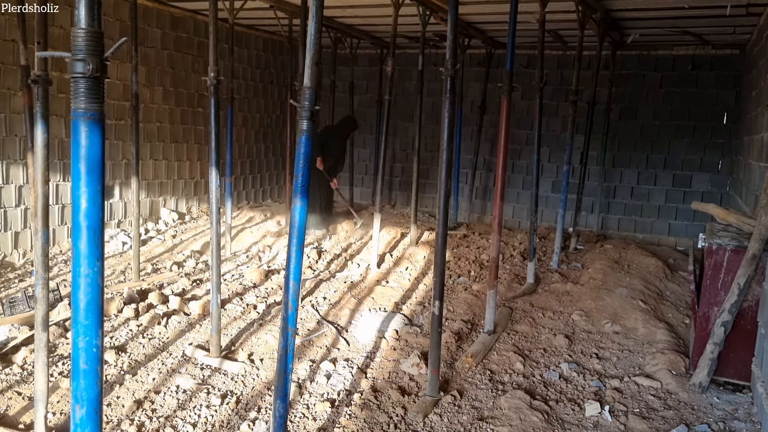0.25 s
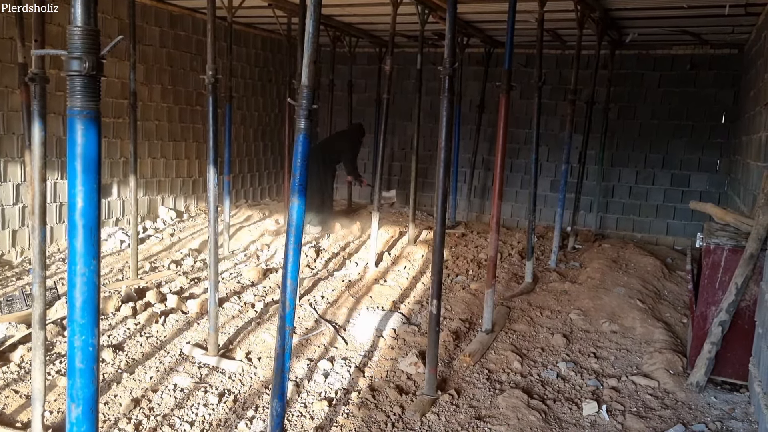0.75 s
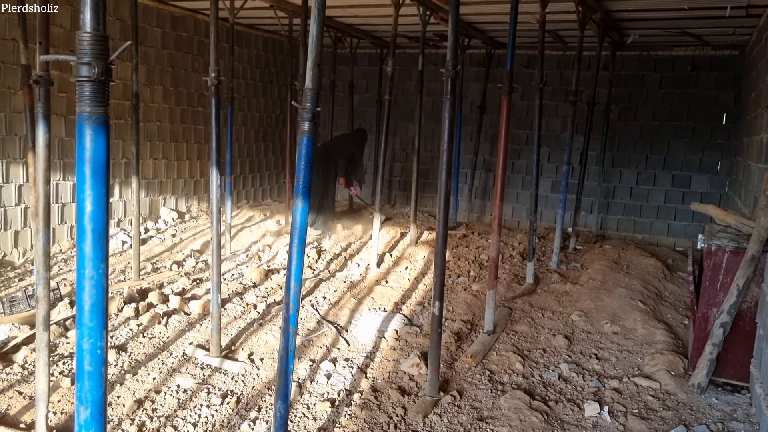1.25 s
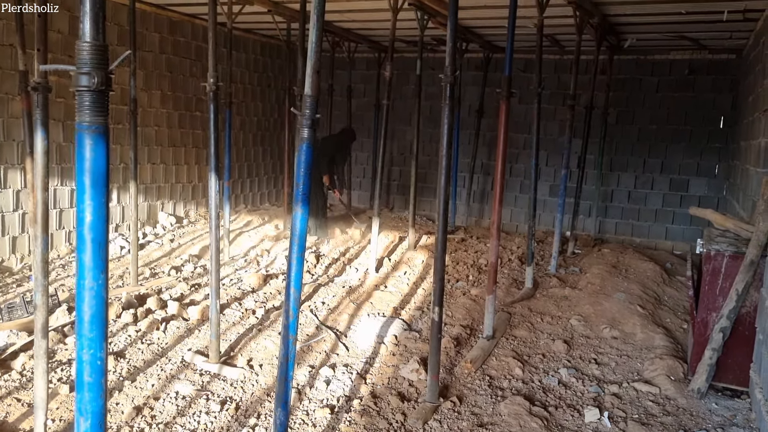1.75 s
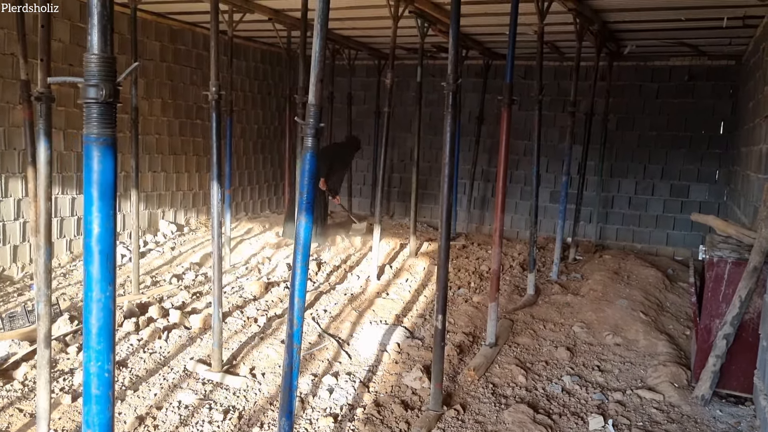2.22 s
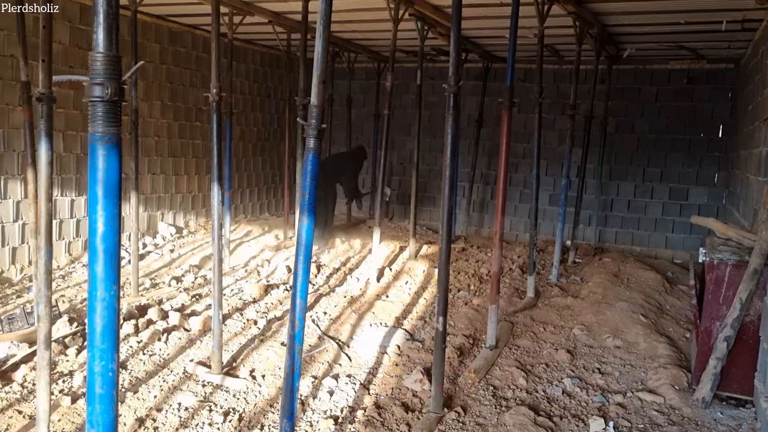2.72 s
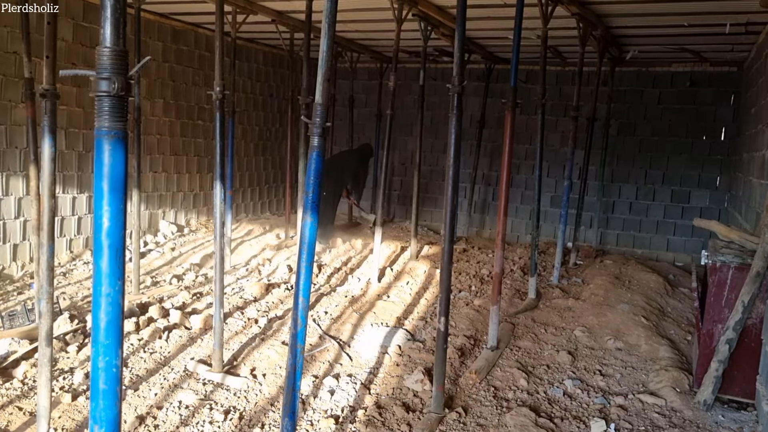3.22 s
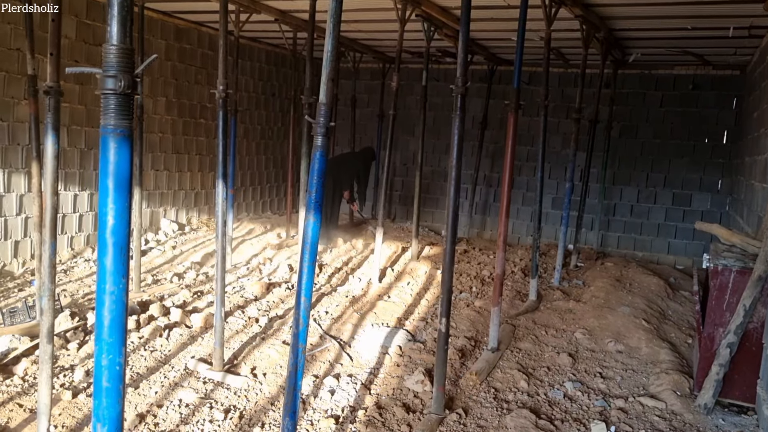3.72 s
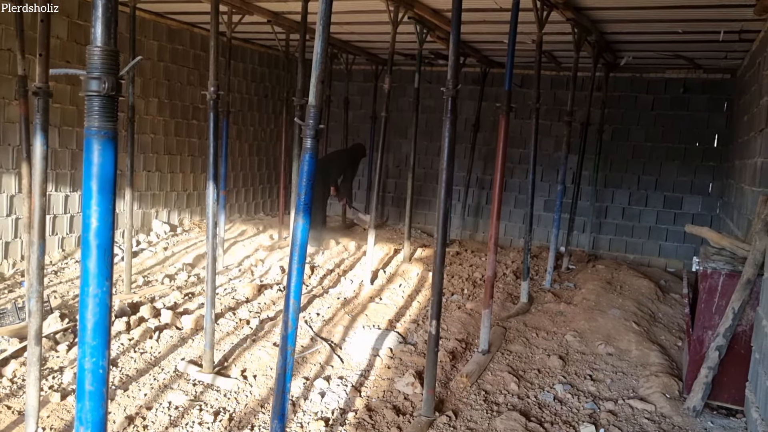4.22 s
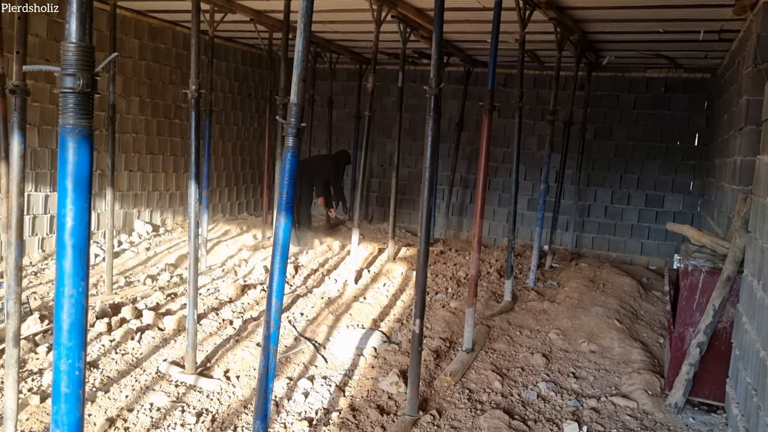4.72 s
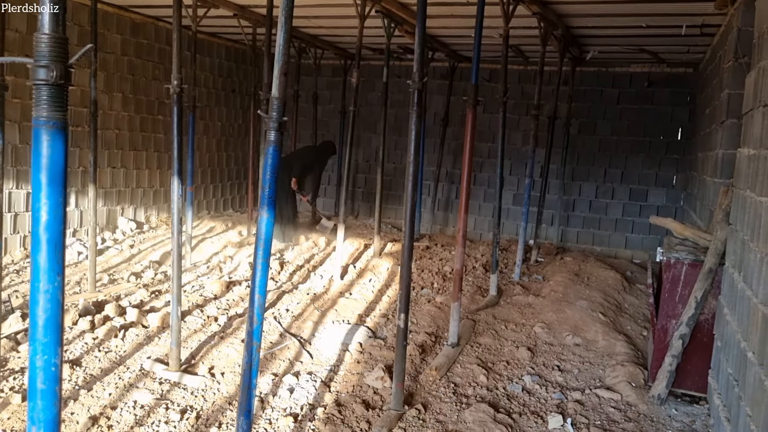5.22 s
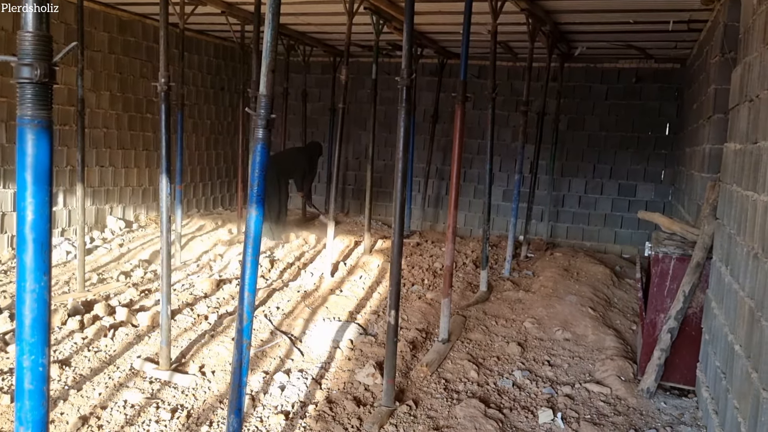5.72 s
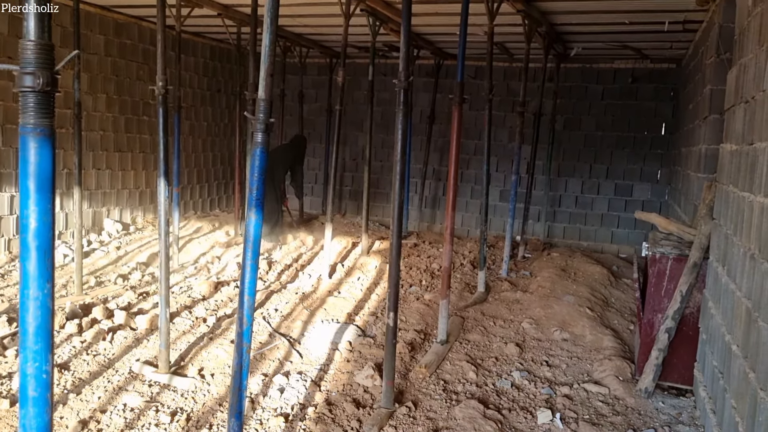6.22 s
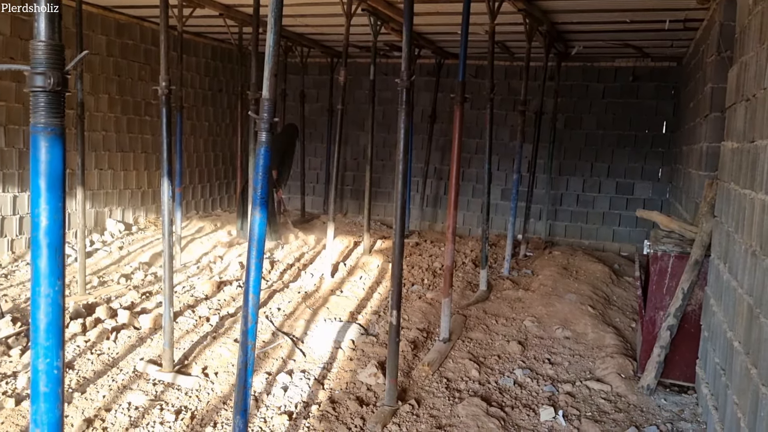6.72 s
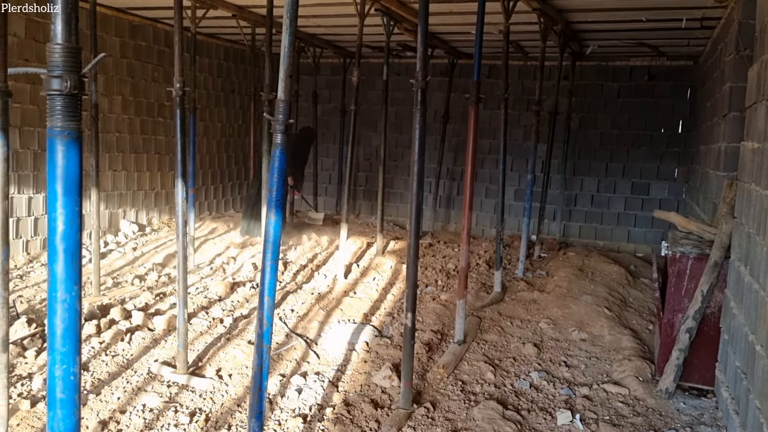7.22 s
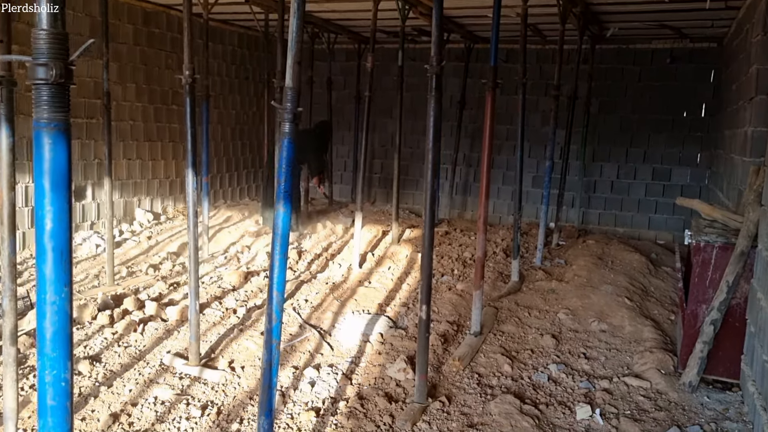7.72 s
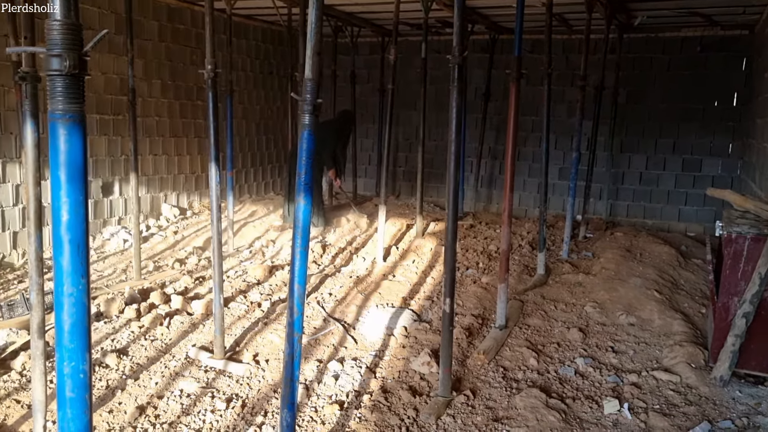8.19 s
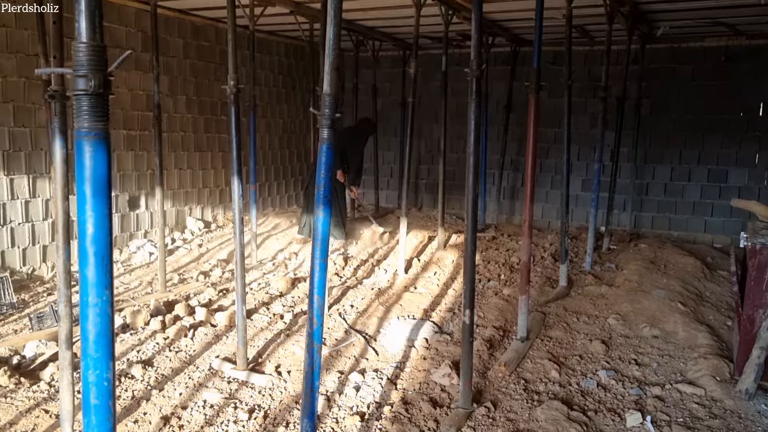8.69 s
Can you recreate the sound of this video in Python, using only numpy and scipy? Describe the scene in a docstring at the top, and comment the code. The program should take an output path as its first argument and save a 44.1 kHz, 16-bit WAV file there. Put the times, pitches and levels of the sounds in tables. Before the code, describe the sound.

Single metallic knocks and short crunches open the digging, then harder blows against stone ring through the shovel blade, followed by trickling earth. Later comes a slower long scrape, then loose clods and soft steps. The unfinished room adds close scatter and a short tail. Wind rumbles against the handheld microphone, a finger clicks on its case, and sparrows whistle faintly outside.

```python
"""Grit crunches as a steel shovel works dry stony earth some metres away in an unfinished block building.
Contact swells drive random grains, heard directly and through the blade's modes; stones strike and squeak.
Wind, made of coloured noise, buffets the two microphone ports; clods, pebbles and dull low footfalls are
short tones. Sparrows outside are gliding whistles, a finger ticks on the hand-held recorder, and steel
props ring as fading sines. A faint hush stays underneath; the room adds near scatter and a tail."""
import sys
import numpy as np
from scipy import signal
from scipy.fft import rfft, irfft, next_fast_len
from scipy.io import wavfile

SR = 44100
rng = np.random.default_rng(int(sys.argv[2]) if len(sys.argv) > 2 else 0)


def to_wav(s):
    """Save 16-bit WAV."""
    ch = np.atleast_2d(s).T  # columns
    pcm = np.round(np.clip(ch, -1, 1) * 32767)  # PCM
    wavfile.write(sys.argv[1], SR, pcm.astype(np.int16))


N = 394694

# Blade on stone. Each row: start in seconds, relative level of the hit in dB, relative level of the thump in dB.
STRIKES = [(1.041, -35.5, -46), (1.442, -64, -75), (1.902, -57, -52.5), (2.931, -34, -34.5),
           (3.668, -33, -43), (3.709, -16.5, -63), (3.887, -33, -61), (4.701, -23.5, -77),
           (5.802, -33, -45.5), (6.962, -36.5, -43.5), (7.63, -42, -47.5)]
# Tone of grit and splintering stone. Each row: frequency in Hz, relative spectrum level in dB.
GRIT_COLOUR = [(710, -32.5), (1200, 3.5), (1540, -16.5), (2040, -9.5), (2300, -2), (3150, -7.5),
               (4100, -2.5), (6370, 0.5), (7330, -2.5), (9110, -24.5), (12700, -19.5), (16000, -25.5)]


def from_db(db):
    """Gain of a level in dB."""
    return 10 ** (np.asarray(db) / 20)


def rms_one(x):
    """Scaled to rms 1."""
    return x / np.sqrt(np.mean(x ** 2) + 1e-20)


def in_time(rows):
    """Columns of a table, joined by straight lines and read at every sample."""
    s, *columns = np.transpose(rows)
    return [np.interp(np.arange(N) / SR, s, c) for c in columns]


def at_hz(points, hz):
    """A table read on a log-frequency axis."""
    table = np.array(points)
    return np.interp(np.log(hz + 1), np.log(table[:, 0]), table[:, 1])


def colour(x, spectrum):
    """Filter by a smooth curve of dB over Hz."""
    size = next_fast_len(x.shape[-1])
    gain = from_db(at_hz(spectrum, np.fft.rfftfreq(size, 1 / SR)))
    return irfft(rfft(x, size) * gain, size)[..., :x.shape[-1]]


def drift(rate_hz):
    """Slow random wandering of rms 1: noise through two equal low-pass poles."""
    step = 40   # samples between the slow values
    r = np.exp(-2 * np.pi * rate_hz * step / SR)
    noise = rng.standard_normal(N // step + 2002)
    slow = signal.lfilter([1], [1, -2 * r, r * r], noise)[2000:]   # the filter has settled
    return np.interp(np.arange(N) / step, np.arange(len(slow)), rms_one(slow))


def grains(per_s, spread_db):
    """Random contacts of uneven size, coming in clumps; rms 1."""
    sizes = from_db(spread_db * np.minimum(rng.exponential(1, N), 5)) * rng.choice([-1, 1], N)
    chance = per_s * from_db(3.5 * drift(40)) / SR
    return rms_one(sizes * (rng.random(N) < chance))


def ring(x, hz, width):
    """One resonance of the given width in Hz, gain 1 on top."""
    r = np.exp(-np.pi * width / SR)
    poles = [1, -2 * r * np.cos(2 * np.pi * hz / SR), r * r]
    return signal.lfilter([(1 - r * r) / 2, 0, (r * r - 1) / 2], poles, x + 1e-18)


def contact():
    """Gains of grit, clods and bowl: each contact swells, changes over its length and is released."""
    # Crunch of blade, falling clods or footsteps, one row a push, drag, slide or step.
    # Each row: start, rise and length in seconds, relative grit level at the top and at the end in dB,
    # clods and ring of the bowl relative to grit in dB.
    crunches = [ (0, 0.00067, 0.0046, -49, -55, 4.5, 9), (.05, 0.025, 0.45, -65, -71, -6, 8),
                (0.238, 0.00099, 0.018, -48, -51.5, -7, -9), (.3, 0.047, 0.3, -100, -102.5, 15, -9),
                (.55, 0.036, 0.17, -70.5, -69, -8.5, -20), (.74, 0.028, .3, -77, -84, -2.5, 2),
                (1.041, 0.0012, 0.15, -43, -44.5, -2.5, 8), (1.2, 0.025, 0.096, -52, -42, -6, 10.5),
                (1.33, 0.034, .11, -43, -56, -5.5, -21.5), (1.439, 0.0042, 0.004, -26.5, -46.5, 7, 6.5),
                (1.518, 0.087, 0.41, -48.5, -70.5, -5.5, -1), (1.902, 0.0011, 0.022, -47, -48.5, -5, 8),
                (1.95, 0.01, 0.19, -58, -67.5, -2.5, 2), (2.27, 0.045, 0.12, -75, -87, 12.5, -3),
                (2.45, 0.027, .2, -75.5, -90.5, -2.5, -1), (2.672, 0.0017, 0.034, -64, -70, -17, -36),
                (2.933, 0.0087, 0.026, -29, -35, -6, 12), (3.05, 0.046, 0.4, -59, -86, -6.5, 2),
                (3.66, 0.013, .04, -34.5, -40.5, -9, 1.5), (3.71, 0.00098, 0.043, -26.5, -36, -7.5, 1.5),
                (3.75, 0.0046, 0.15, -46.5, -53.5, 0.5, -13), (3.889, .002, 0.058, -40.5, -60.5, 3.5, -23),
                (3.95, 0.011, 0.17, -59.5, -62.5, -0.5, -9), (4.19, 0.047, 0.14, -66, -82, 7.5, 15),
                (4.28, .04, 0.052, -58.5, -70, -17.5, -6), (4.389, 0.045, 0.046, -80, -93, 21, 20),
                (4.48, .07, .12, -74.5, -82, -22, -27), (4.704, .002, 0.017, -31, -28, -8.5, 6),
                (4.76, 0.034, 0.1, -53.5, -53.5, -3, -22), (4.9, 0.049, 0.57, -65, -95, -2.5, 1),
                (5.65, 0.048, 0.15, -90.5, -75, -20, -22.5), (5.795, 0.015, 0.039, -38.5, -43, -13.5, 2),
                (5.891, 0.0038, 0.81, -48, -105, -2, -15), (6.15, 0.037, 0.57, -66.5, -61, 0.5, 3),
                (6.701, 0.28, 0.33, -51, -70, -1, -4), (7.04, .02, 0.21, -73, -69.5, 5.5, -8),
                (7.26, .03, 0.22, -76.5, -71, 2.5, -21), (7.46, 0.034, 0.17, -63.5, -69, -3.5, -29),
                (7.623, 0.02, 0.051, -43, -58, -6, -17), (7.691, 0.047, 0.23, -54.5, -57, -5.5, -4),
                (7.95, 0.061, .14, -57.5, -68, 2, 2), (8.08, 0.1, 0.48, -54, -68.5, -0.4, 0),
                (8.5, 0.013, 0.16, -59.5, -62.5, 3, -11), (8.635, 0.0018, 0.086, -57, -52.5, -7, -19),
                (8.73, .01, 0.25, -58.5, -82, -24, -4)]
    # Fall after the contact, in dB per second: grit, clods, bowl.
    release_db_per_s = (262, 221, 316.5)
    # Reduction at the start in dB: grit, clods, bowl; clods and bowl come in after the grit.
    late_db = (-1.4, 12, 17)
    late_s, swell_db = 0.0078, 22.5
    power = np.full((3, N), from_db(2 * -90.5))   # soil always trickles faintly
    for s, rise_s, length_s, top_db, end_db, clod_db, bowl_db in crunches:
        at = int(max(s, 0) * SR)
        t = np.arange(min(int((length_s + .4) * SR), N - at)) / SR
        rise_s = max(rise_s, 1 / SR)
        corners_s = [0, rise_s, max(length_s, rise_s + 1 / SR)]
        shape_db = np.interp(t, corners_s, [top_db - swell_db, top_db, end_db])
        released_s = np.maximum(t - length_s, 0)
        for k, share_db in enumerate((0, clod_db, bowl_db)):
            onset_db = late_db[k] * np.exp(-t / late_s)
            level_db = shape_db + share_db - onset_db - release_db_per_s[k] * released_s
            power[k, at:at + len(t)] += from_db(2 * level_db)
    return np.sqrt(power)


def blade_ring(high, low, bowl, grit, clods):
    """Crunching earth and stone hits drive the modes of the steel blade."""
    # Modes of the steel. Each row: frequency in Hz, width in Hz unless damping widens it, relative level in dB.
    modes = [(587.9, 15, -3), (845.3, 12, 1.5), (1040, 28, -11), (1217, 55, -11.5), (1390, 36, -15),
             (1660, 45, -9), (1875, 29, -20), (2240, 50, -16.5), (2790, 15, -48.5), (3005, 40, -9),
             (3250, 170, -22.5), (3750, 69, -9), (4100, 21, -33), (5040, 27, -9.5), (5570, 140, -33),
             (5490, 120, -7.5), (6226, 88, -15), (7030, 110, -24.5), (9500, 49, -35)]
    least_width = .02   # share of the pitch: earth on the blade damps the high modes
    s, hit_db, _ = np.transpose(STRIKES)
    at = (s * SR).astype(int)
    grit_db = 20 * np.log10(high)
    out = np.zeros(N)
    for k, (hz, width, mode_db) in enumerate(modes):
        if hz < 700:
            drive = bowl * clods * from_db(26.5)
        elif hz < 1700:
            drive = low * clods * from_db(22.5)
        else:   # grit drives the high modes, more so the harder the push
            drive = high * grit * from_db(17.5 + 0.043 * (grit_db + 37.0))
        wander_db = 1.5 if hz < 700 else 3.5
        drive = drive * from_db(wander_db * drift(7))   # the contact point wanders
        drive[at] += from_db(hit_db + 29.0 + rng.normal(0, 3.8, len(at)))
        sign = (-1) ** k
        out += sign * from_db(mode_db) * ring(drive, hz, max(width, least_width * hz))
    return out


def stone_hits():
    """Stone splinters for a few ms as decaying noise, and the ground gives a dull thump."""
    s, hit_db, thump_db = np.transpose(STRIKES)
    at = (s * SR).astype(int)
    crack, thump = np.zeros(N), np.zeros(N)
    crack[at], thump[at] = from_db(hit_db - 4), from_db(thump_db)
    crack_fade, thump_fade = np.exp(-1 / (0.0047 * SR)), np.exp(-1 / (0.051 * SR))   # decay times in s
    splinter = rms_one(colour(rng.standard_normal(N), GRIT_COLOUR))
    ground = rms_one(ring(rng.standard_normal(N), 160.0, 77))
    cracks = signal.lfilter([1], [1, -crack_fade], crack) * splinter
    return cracks + signal.lfilter([1], [1, -thump_fade], thump) * ground


def shovel():
    """Grit and clods crunch at blade or foot; part is heard directly, part through the modes of the steel."""
    # Tone of the clods. Each row: frequency in Hz, relative spectrum level in dB.
    clod_colour = [(82, -37.5), (140, -7.5), (178, 1), (363, -7.5), (602, -3.5), (1090, -9.5),
                   (1520, -16.5), (2500, -24), (3250, -41), (5500, -120)]
    high, low, bowl = contact()
    grit, clods = grains(per_s=3000, spread_db=-0.5), grains(per_s=500, spread_db=2.5)
    crunch = from_db(-1.5) * high * rms_one(colour(grit, GRIT_COLOUR))
    crunch += from_db(5.0) * low * rms_one(colour(clods, clod_colour))
    return crunch + blade_ring(high, low, bowl, grit, clods) + stone_hits()


def scatter(x, count):
    """Near echoes, own at each port; the source wanders between places that scatter differently."""
    t60_s, level_db = 0.027, 6.5   # off ground and props, above 1.5 kHz
    t = np.arange(SR // 10) / SR
    weights = np.array([from_db(19.0 * drift(11.4)) for place in range(count)])
    weights = weights / np.sqrt(np.sum(weights ** 2, axis=0))
    high_pass = signal.butter(2, 1500, "high", fs=SR, output="sos")
    echoes = signal.sosfilt(high_pass, rng.standard_normal((count, 2, len(t))))
    echoes = echoes * from_db(level_db - 60 * t / t60_s) / np.sqrt(t60_s * SR / np.log(1e6))
    return sum(signal.oaconvolve((x * w)[None], e, axes=1)[:, :N] for w, e in zip(weights, echoes))


def hall(x, wet_db):
    """Direct sound reaches the left port first; near scatter follows at once, then a tail dying by band."""
    # The room. Each row: frequency in Hz, t60 in seconds, relative level of the tail in dB.
    room = np.array([(200, 0.49, -10), (680, 0.13, -4.5), (2070, 0.29, 2.5), (4985, 0.3, -4.5),
                     (10000, 0.18, -2.5)])
    right_lag_s = 0.00024   # sound arrives a little from the left
    t, tail = np.arange(SR // 2) / SR, 0
    edges = 100 * 2 ** np.arange(0, 7.6, .5)   # half-octave bands, Hz
    for low, high in zip(edges, edges[1:]):
        shared, own = rng.standard_normal(len(t)), rng.standard_normal((2, len(t)))
        alike = np.clip(1 - low / 2200, 0, 1)   # long waves are alike at both ports
        noise = np.sqrt(alike) * shared + np.sqrt(1 - alike) * own
        band = signal.sosfilt(signal.butter(2, [low, high], "band", fs=SR, output="sos"), noise)
        t60, tail_db = at_hz(room[:, :2], low), at_hz(room[:, ::2], low)
        tail = tail + band * from_db(tail_db - 60 * t / t60) / np.sqrt(t60 * SR / np.log(1e6))
    answer = from_db(wet_db) * tail * np.clip((t - .002) / 0.0073, 0, 1)   # the tail builds up
    answer[0, 0] += 1
    answer[1, round(right_lag_s * SR)] += 1
    return signal.fftconvolve(x[None], answer, axes=1)[:, :N] + scatter(x, count=4)


def at_ports(level_db, pan_db):
    """Power at left and right; the stronger port carries most of the level."""
    left, right = 1 / (1 + from_db(-2 * pan_db)), 1 / (1 + from_db(2 * pan_db))
    return 4 * from_db(2 * level_db) * np.array([left, right])


def wind():
    """Lumpy turbulence, its own at each port; buffets swell and die over the breeze."""
    # Breeze. Each row: time in seconds, relative level in dB, left minus right in dB.
    breeze = [(0, -49.5, 16), (.5, -57, 8), (.75, -43.5, 3), (1.2, -57, -2), (1.6, -55, 7), (1.9, -64, 3),
              (2.85, -72.5, 7), (3.0, -53.5, 19), (3.3, -61.5, 6), (3.45, -32, 1.5), (3.56, -34, 7),
              (3.9, -42.5, 6.5), (4.2, -72.5, 15), (4.7, -45, -10.5), (5.3, -65.5, 16.5), (6.3, -62, 1),
              (6.6, -54.5, 16), (7.25, -43.5, 9), (7.33, -78.5, 6), (7.6, -59.5, 9), (8.3, -62.5, 6),
              (8.7, -49.5, -2), (8.95, -61, 1)]
    # Single buffets against the ports. Each row: time of the top in seconds, relative level in dB,
    # left minus right in dB.
    buffets = [(0.12, -37.5, 23), (0.169, -35, 39), (0.261, -37.5, 27), (0.4, -50.5, 54), (0.45, -46, 14),
               (0.681, -34, 15), (0.822, -36, 28), (0.948, -28, 31), (1.06, -36, 2), (1.14, -38.5, 8),
               (1.28, -40.5, 0), (1.48, -51, 20), (1.63, -47, 20), (2.95, -37.5, 17), (3.03, -38, 20),
               (3.16, -52, 16), (3.648, -21.5, 31), (3.822, -25.5, 21), (4.03, -39, 24), (4.14, -41.5, 0.5),
               (4.28, -43.5, 29), (4.41, -44.5, 28), (4.56, -41.5, -10.5), (4.76, -31, 21), (5.06, -51, 18),
               (5.12, -46, 25), (5.28, -49, 26), (5.551, -44, 32), (5.64, -55.5, 34), (5.7, -57, 25),
               (5.82, -63, 11), (5.98, -47, -3), (6.098, -36.5, 17), (6.24, -43, 6), (6.388, -40.5, 28),
               (6.458, -39.5, 32), (6.599, -23.5, 30), (6.742, -27, 39), (6.88, -40, 26), (6.98, -41, 9),
               (7.111, -35.5, 28), (7.179, -35.5, 33), (7.45, -46.5, 26), (7.7, -39.5, 21), (7.75, -47, 28),
               (8.03, -43.5, 12), (8.161, -38.5, 22), (8.68, -53, 3)]
    # Tone of the wind. Each row: frequency in Hz, relative spectrum level in dB.
    wind_colour = [(12, -59), (20, -15), (49, 3.5), (77, 1.5), (103, -4.5), (281, -32), (357, -40),
                   (614, -52.5), (900, -68.5), (1170, -76), (1980, -120)]
    rise_db_per_s, fall_db_per_s = 516.5, 382
    power, t = at_ports(*in_time(breeze)), np.arange(N) / SR
    for s, level_db, pan_db in buffets:
        near = slice(max(int((s - .25) * SR), 0), int((s + .25) * SR))
        away_db = np.maximum(rise_db_per_s * (s - t[near]), fall_db_per_s * (t[near] - s))
        power[:, near] += at_ports(level_db, pan_db)[:, None] * from_db(-2 * away_db)
    gusts = []
    for port in "LR":
        lumpy = rng.standard_normal(N) * from_db(2.7 * drift(49.0))
        gusts.append(rms_one(colour(lumpy, wind_colour)))
    return np.sqrt(power) * gusts


def hush():
    """Faint steady noise under everything, independent in left and right."""
    # Tone of the hush. Each row: frequency in Hz, relative spectrum level in dB.
    hush_colour = [(59, -20), (100, -1.5), (229, -8.5), (583, -20.5), (836, -25.5), (2520, -24.5),
                   (5530, -25.5), (6560, -24.5), (8640, -33), (13500, -21.5), (16000, -15)]
    return from_db(-67) * rms_one(colour(rng.standard_normal((2, N)), hush_colour))


def lumps():
    """Each lump or footfall rings at its own pitch, opens with a broad tick and crumbles a little."""
    # Clods and pebbles that land or knock together, and dull low footfalls. Each row: start in seconds,
    # relative level in dB, pitch in Hz, t60 of the crumble in seconds.
    landings = [(.058, -43, 863, 0.21), (.22, -54, 2200, 0.021), (0.421, -59.5, 867, 0.29),
                (1.72, -42, 790, 0.064), (1.915, -42, 237, 0.19), (2.111, -52.5, 1167, 0.091),
                (2.3, -57, 800, 0.17), (4.21, -54, 546, 0.21), (4.248, -64, 1342, 0.088),
                (4.4, -56, 769, 0.11), (4.412, -60.5, 1330, 0.13), (7.05, -57, 780, 0.082),
                (7.116, -48.5, 1866, 0.049), (7.239, -42.5, 1000, 0.019), (7.378, -53, 953, 0.068),
                (7.64, -47, 808, 0.21), (8.02, -41.5, 818, 0.052), (8.501, -41.5, 870, 0.039),
                (8.522, -44, 2340, 0.035), (8.522, -49, 1386, 0.083), (8.574, -43.5, 1444, 0.084),
                (8.575, -53, 2840, 0.066), (8.637, -42.5, 2830, 0.027), (8.641, -53, 1230, 0.12),
                (8.7, -51, 4850, 0.07), (8.71, -51.5, 894, 0.052), (6.901, -52.5, 503, 0.23),
                (7.645, -41, 171, 0.21), (8.024, -44.5, 187, 0.26), (8.219, -53, 180, 1),
                (8.631, -52.5, 169.8, 1)]
    out, t = np.zeros(N + SR), np.arange(SR // 2) / SR
    for s, level_db, hz, t60 in landings:
        knock = np.sin(2 * np.pi * hz * t) * from_db(-60 * t / (1.23 * t60))
        crumble = 0.92 * rms_one(ring(rng.standard_normal(len(t)), hz, 0.081 * hz)) * from_db(-60 * t / t60)
        tick = 0.91 * rms_one(ring(rng.standard_normal(len(t)), hz, 0.5 * hz)) * from_db(-60 * t / 0.0069)
        attack = np.minimum(t * hz / 0.74, 1)   # full after 0.74 of a cycle
        at = int(s * SR)
        out[at:at + len(t)] += from_db(level_db) * (knock + crumble + tick) * attack
    return out[:N]


def glides(rows, overtones, hoarseness):
    """Tones with a trembling pitch that hold, then glide and weaken."""
    out, hoarse = np.zeros(N), drift(210)
    glide_fade_db = 7.5
    for s, held_s, glide_s, first_hz, last_hz, level_db in rows:
        span = np.arange(int(s * SR), int((s + held_s + glide_s) * SR))
        glided = np.clip((span / SR - s - held_s) / glide_s, 0, 1)
        hz = first_hz * (last_hz / first_hz) ** glided * (1 + hoarseness * hoarse[span])
        phase = 2 * np.pi * np.cumsum(hz) / SR
        tone = sum(from_db(db) * np.sin(round(k) * phase) for k, db in overtones)
        level = from_db(level_db - glide_fade_db * glided)
        out[span] += signal.windows.tukey(len(span), .3) * level * tone
    return out


def sparrows():
    """Short gliding whistles, mostly falling and slightly hoarse: one sine each."""
    # Whistles outside. Each row: start, held time and glide time in seconds, first and last pitch in Hz,
    # relative level in dB.
    chirps = [(2.04, .004, 0.042, 6430, 5130, -65), (2.09, 0.01, 0.021, 5450, 4460, -58.5),
              (2.39, 0.026, 0.029, 5720, 4260, -63.5), (2.389, 0.037, 0.013, 6400, 5540, -64),
              (2.535, 0.0046, 0.067, 6760, 4440, -65.5), (2.675, 0.0022, 0.015, 7470, 4100, -60.5),
              (2.69, .003, 0.05, 4700, 3540, -70.5), (2.692, 0.0024, 0.056, 4080, 2560, -67.5),
              (5.22, 0.031, 0.034, 5830, 2090, -60), (5.265, 0.0037, .03, 3320, 2690, -80.5),
              (5.665, 0.0117, 0.047, 6570, 5360, -78.5), (7.46, 0.0052, 0.056, 6400, 3700, -76.5),
              (7.855, .002, 0.026, 3250, 4100, -60.5), (7.88, 0.0054, 0.024, 4110, 3060, -62),
              (7.92, 0.0032, 0.057, 4340, 3200, -76)]
    return glides(chirps, [(1, 12.7)], hoarseness=.022)


def ticks():
    """Dry short knocks through the case: a quick rattle, then the shell snaps back."""
    # Finger on the case. Each row: start in seconds, relative level in dB, low-pass cutoff in Hz.
    taps = [(2.759, -48.5, 1980), (6.222, -18.5, 5400), (6.254, -34.5, 2500), (7.581, -35.5, 3000)]
    out, t = np.zeros(N), np.arange(300) / SR
    rattle = 0.49 * np.sin(2 * np.pi * 1700 * t) * np.exp(-((t - .001) / 0.00016) ** 2)
    late = np.maximum(t - .0017, 0)
    snap = -1.6 * np.sin(2 * np.pi * 600 * late) * np.exp(-late / 0.00027)
    snap += 0.39 * (late > 0) * np.exp(-late / .0001)
    for s, level_db, bright_hz in taps:
        low_pass = signal.butter(4, bright_hz, fs=SR, output="sos")
        at = int(s * SR)
        out[at:at + len(t)] = from_db(level_db) * signal.sosfilt(low_pass, rattle + snap)
    return out


def squeaks():
    """The blade squeaks on a stone: short stacks of overtones without their fundamental."""
    # Each row: start, held time and glide time in seconds, first and last fundamental in Hz,
    # relative level in dB.
    rubs = [(3.63, .002, 0.047, 1096, 1185, -71), (7.508, 0.025, 0.023, 1310, 1080, -61.5)]
    # Each row: multiple of the fundamental, relative level in dB.
    overtones = [(2, 8), (3, -3.5), (4, -3.5), (5, -10)]
    return glides(rubs, overtones, hoarseness=.012)


def props():
    """Pebbles set steel props ringing: one clean fading sine each."""
    # Each row: start in seconds, relative level in dB, pitch in Hz, t60 in seconds.
    notes = [(5.095, -74, 2240, 0.55), (8.724, -66, 1636, 0.91)]
    out, t = np.zeros(N + SR), np.arange(SR // 2) / SR
    for s, level_db, hz, t60 in notes:
        note = from_db(level_db - 60 * t / t60) * np.sin(2 * np.pi * hz * t)
        at = int(s * SR)
        out[at:at + len(t)] += note * np.minimum(t / 0.0088, 1)
    return out[:N]


def port_colour(air):
    """Airborne sound takes the colour of each port, half the difference to each side."""
    # Each row: frequency in Hz, left minus right in dB.
    difference = [(60, 0.5), (110, 10), (200, -1.5), (380, 3), (700, 2), (1290, -0.5), (2380, 2),
                  (4400, -8.5), (8120, -8.5), (15000, -0.5)]
    left = colour(air[0], [(hz, d / 2) for hz, d in difference])
    right = colour(air[1], [(hz, -d / 2) for hz, d in difference])
    return np.array([left, right])


def scene():
    """Digging, steps, birds and hush come through the air; wind and finger act on the recorder itself."""
    ground = from_db(-4.5) * hall(shovel() + lumps(), wet_db=2.5)
    birds = from_db(-9.5) * hall(sparrows(), wet_db=5.5)
    air = ground + birds + props() + squeaks() + hush()
    return port_colour(air) + wind() + ticks()


def record(dry):
    """A steep low-pass cuts the top: down 70 dB from the stop frequency up."""
    stop_hz = 16274
    return signal.sosfilt(signal.cheby2(14, 70, stop_hz, fs=SR, output="sos"), dry)


dry = scene()
out = record(dry)
to_wav(out)
```